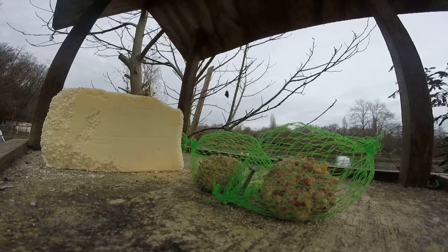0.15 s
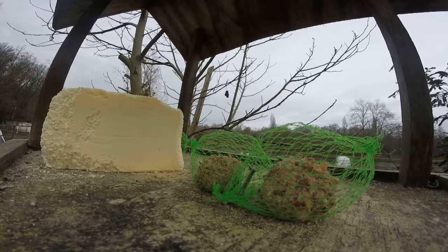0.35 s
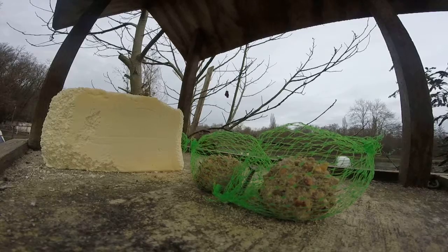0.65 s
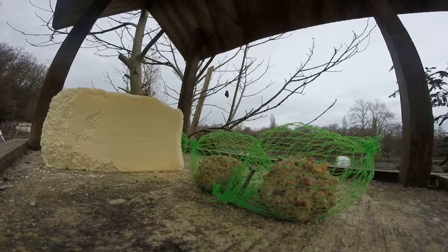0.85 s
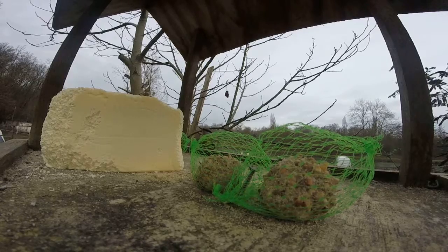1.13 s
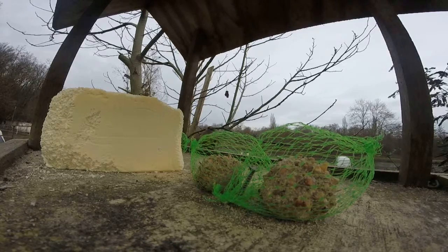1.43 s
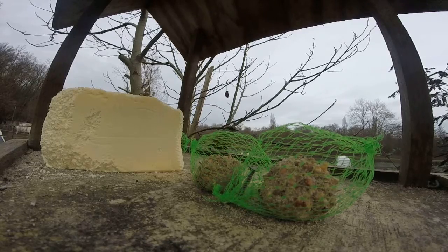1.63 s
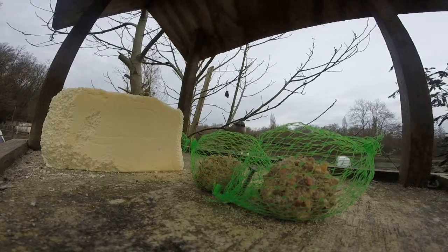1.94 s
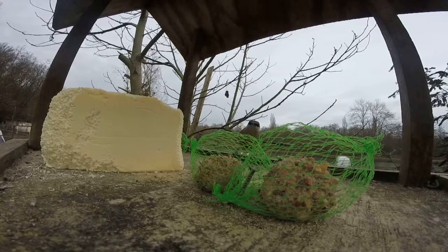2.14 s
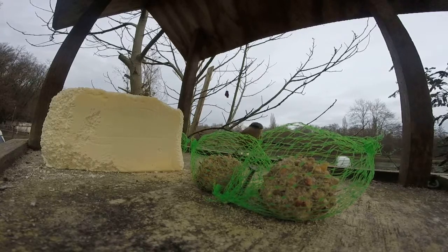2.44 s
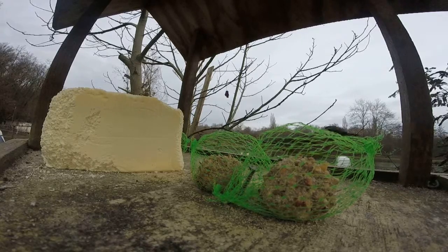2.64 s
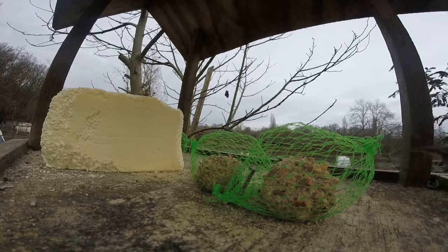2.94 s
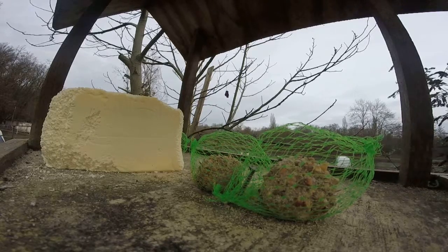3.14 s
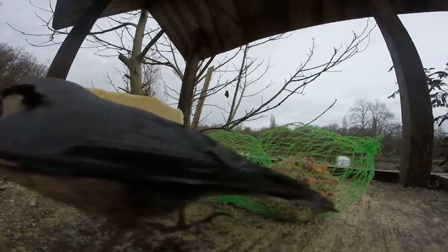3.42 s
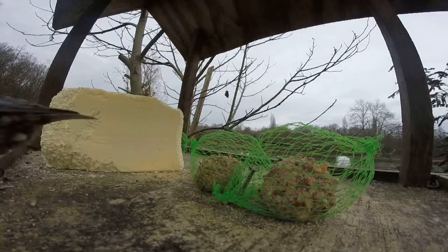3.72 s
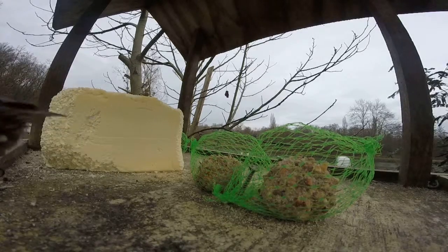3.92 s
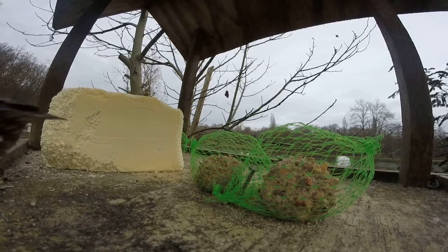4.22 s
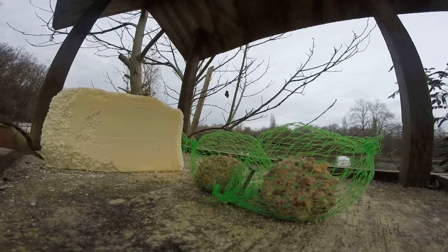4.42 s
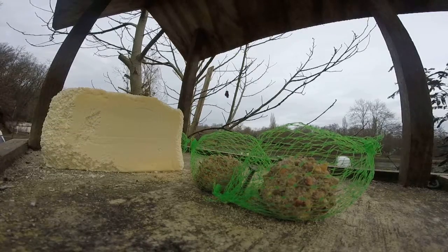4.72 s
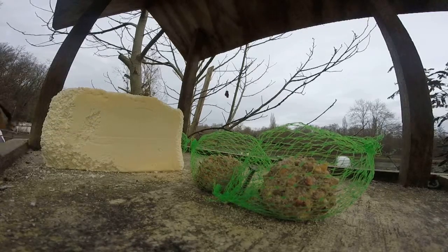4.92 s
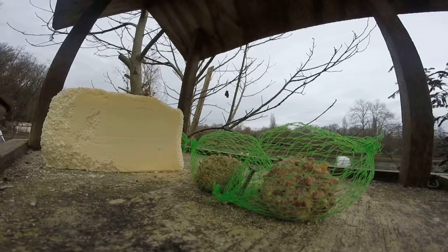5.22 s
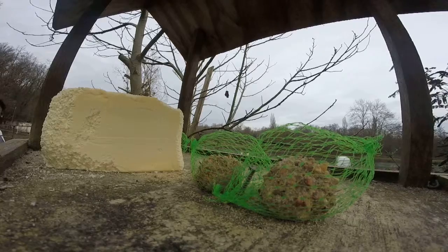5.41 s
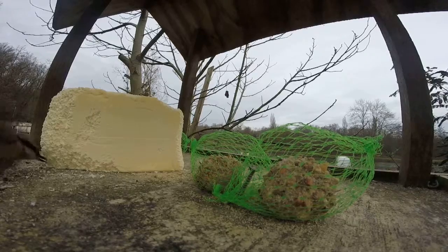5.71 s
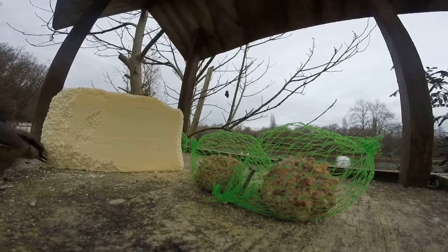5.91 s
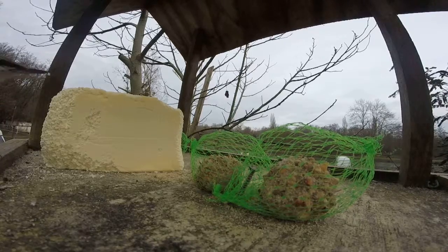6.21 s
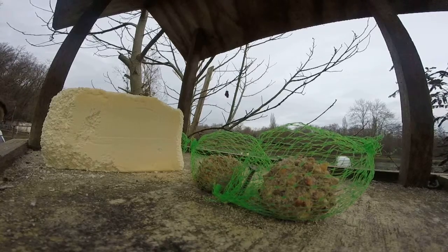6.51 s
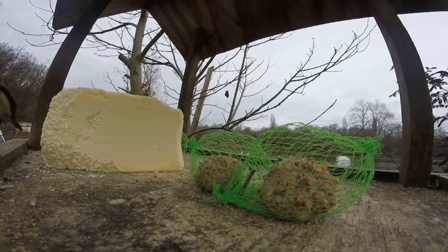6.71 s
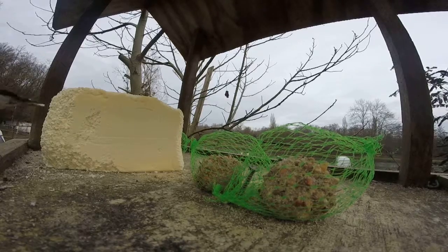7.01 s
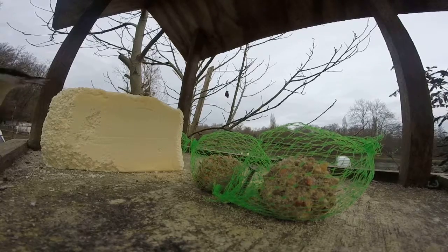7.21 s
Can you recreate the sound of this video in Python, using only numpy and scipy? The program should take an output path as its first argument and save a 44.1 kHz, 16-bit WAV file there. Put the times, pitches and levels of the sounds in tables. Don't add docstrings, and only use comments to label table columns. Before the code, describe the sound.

Very close to a microphone in a hard housing, a small bird lands on a wooden feeder table with sharp clicks and knocks. Its claws tick, scrape and shuffle in uneven bursts between pauses. One light peck comes late, then a firmer one and two full blows that boom hollowly and rattle the boards. Low rumbles follow the hops, over faint hiss.

```python
import sys
import numpy as np
from scipy import signal
from scipy.fft import rfft, irfft, next_fast_len
from scipy.io import wavfile
from scipy.ndimage import uniform_filter1d, map_coordinates

SR = 44100
rng = np.random.default_rng(int(sys.argv[2]) if len(sys.argv) > 2 else 0)


def digitize_waveform(pressure):
    field = np.atleast_2d(pressure).T
    bounded = np.clip(field, -1, 1)
    quanta = np.round(bounded * 32767).astype(np.int16)
    wavfile.write(sys.argv[1], SR, quanta)


def invert_db(level):
    return 10 ** (np.asarray(level, dtype=float) / 20)


N = 324135

# t/s, level/dB
PECK_BLOWS = [
    (4.8962, -24),
    (5.8377, -14),
    (6.0359, -8),
    (6.8777, -8),
]
# f/Hz, share, t60/s
TABLE_MODES = [(303.3, -1, .086), (368.5, .93, .049), (222, -.05, .2), (465, .04, .09)]
# f/Hz, level/dB, t60/s
POST_MODES = [(69, -15.5, 0.096), (109, -29.5, 0.091)]
# f/Hz, width/Hz, level/dB
JOINT_MODES = [(463, 144, 4), (605, 95, 0.5), (697, 78, -0.5), (1500, 170, -7), (1900, 370, -10),
               (3900, 3300, -30.5)]
# f/Hz, width/Hz, level/dB
SHUDDER_MODES = [(229, 52, -0.5), (330, 94, 0.5), (433, 90, -6)]

# f/Hz, width/Hz, level/dB
BOARD_MODES = [(226.2, 12.3, -8), (321, 29, -0.5), (324, 27, 0.5), (385.7, 25.3, -1), (502.6, 13, -14)]
SLAT_MODES = [(590, 100, -12), (750, 61, -26.5), (917, 27, 3), (1120, 94, -4), (1325, 54, -3),
              (1655, 110, -5.5)]
HOUSING_MODES = [(2094, 326, -11), (2520, 187, -1), (2845, 188, -3), (3370, 146, -14), (3980, 300, -19)]
HORN_MODES = [(4330, 2100, 6), (6410, 640, 11.5), (8000, 1400, 4.5), (11200, 5600, -9)]

# t/s, housing click level/dB, board knock level/dB, slat ring level/dB
FOOT_STEPS = [(0.7108, -34, -31, -27.5), (0.7335, -34, -35, -33), (1.5216, -55, -43.5, -45),
              (1.5631, -29, -62, -42), (3.9295, -45.5, -51, -43.5), (2.034, -47, -60, -50),
              (3.937, -50, -59, -57), (1.5713, -48, -42.5, -37), (1.629, -39.5, -40.5, -38),
              (2.028, -47, -42.5, -46), (2.0821, -36, -41.5, -46), (2.0894, -36, -52, -41),
              (2.647, -42.5, -33, -44), (2.652, -40, -51, -37), (2.663, -44, -38, -41),
              (2.8603, -44, -37, -35.5), (2.8664, -31.5, -33, -37), (3.2341, -52, -40, -48),
              (3.2837, -55, -34, -37), (3.2905, -34, -46.5, -39), (3.503, -32, -32, -26.5),
              (3.5975, -33.5, -32.5, -33.5), (3.6049, -43, -33.5, -46), (3.6191, -41, -29, -38),
              (4.4242, -37, -66, -34.5), (4.4552, -39, -43.5, -40), (4.526, -41, -45, -39),
              (4.8467, -51, -40, -44)]
# t/s, housing click level/dB, board knock level/dB,
# slat ring level/dB
FOOT_STAMPS = [
    (0.7247, -28.5, -24, -24),
    (1.62, -27.5, -43, -38.5),
    (3.3105, -30, -60, -40),
    (3.507, -22.5, -24.5, -29.5),
    (4.4206, -34.5, -31.5, -38.5),
    (4.512, -46, -31, -40),
    (4.5171, -35, -36, -40),
    (4.8974, -28, -38, -40),
    (4.9603, -54, -49.5, -64),
]
# t/s, housing click level/dB, slat ring level/dB
CLAW_TAPS = [(0.7618, -45, -42.5), (0.7679, -45, -41), (.775, -41.5, -45), (0.7794, -43, -56),
             (1.9745, -54, -48), (1.9926, -42.5, -50), (2.0468, -48, -56), (2.1138, -37.5, -57),
             (2.7386, -43.5, -63), (2.7633, -39.5, -48), (2.9131, -38.5, -50), (3.0645, -47, -52),
             (0.7495, -48, -53), (3.3415, -45.5, -56), (3.5472, -39.5, -57), (3.6315, -41, -36),
             (3.6445, -42, -41), (3.6538, -38, -40.5), (3.667, -51, -50), (4.555, -58, -64),
             (3.405, -58, -55), (4.4372, -39, -46), (4.868, -45, -51), (4.8935, -34, -47), (5.79, -46, -55),
             (5.8288, -44, -41), (5.9893, -43, -52), (6.019, -52, -51), (6.272, -54, -71),
             (6.316, -47, -60)]
# t/s, housing click level/dB, slat ring level/dB
BEAK_SKIPS = [(5.8387, -37, -32), (5.8501, -43, -48), (5.8563, -42, -50), (6.0372, -26.5, -28),
              (6.0426, -34, -39), (6.0489, -41, -52), (6.0563, -36, -43), (6.8801, -24, -24.5),
              (6.8972, -29.5, -62), (6.9061, -38.5, -50), (6.972, -46, -65)]
# start t/s, length/s, housing click level/dB, board knock level/dB
CLAW_DRAGS = [
    (0.741, 0.02, -55, -41),
    (1.632, 0.014, -51, -47.5),
    (1.967, 0.021, -59, -50.5),
    (2.571, 0.042, -56, -56),
    (2.671, 0.014, -60, -56),
    (2.714, 0.063, -53, -59),
    (2.886, 0.025, -55, -50.5),
    (3.299, .024, -52, -64),
    (3.638, 0.051, -58, -51),
    (4.523, .016, -58, -42),
]
# t/s, level/dB
CLAW_SNAPS = [(.7137, -37), (0.7244, -36), (.7338, -56), (1.5645, -42), (1.629, -50), (2.0829, -43),
              (2.652, -50), (2.7636, -52), (2.8665, -40), (3.2834, -55), (3.2901, -47), (3.3105, -46),
              (3.503, -37), (3.5063, -34.5), (3.5468, -50), (3.598, -43), (3.62, -47), (3.647, -51),
              (4.4239, -54), (4.4536, -48.5), (4.8471, -54)]
# t/s, level/dB
BEAK_SNAPS = [
    (4.8968, -37),
    (5.8387, -51),
    (6.0372, -42),
    (6.0426, -43),
    (6.0563, -39.5),
    (6.8801, -34.5),
    (6.885, -47),
    (6.8972, -35.5),
]

# start t/s, length/s, level/dB
SHUFFLES = [(0.806, .025, -60), (.83, 0.15, -67), (1.927, 0.084, -71), (2.539, 0.094, -59),
            (2.693, 0.096, -62.5), (2.92, 0.046, -61.5), (3.184, .08, -61), (3.352, .09, -62),
            (3.677, .04, -67), (4.347, .05, -58), (4.457, 0.073, -57), (4.526, .04, -68),
            (4.827, 0.093, -62), (5.896, 0.045, -64), (6.064, .03, -71.5), (6.1, .18, -70.5),
            (6.92, 0.093, -65)]
# peak t/s, rocking level/dB, post hum level/dB
WEIGHT_SHIFTS = [(.76, -42, -43.5), (.89, -43, -68), (1.06, -53, -46.5), (1.22, -49, -57),
                 (1.4, -50.5, -66), (1.65, -45, -50.5), (2.06, -49, -56), (2.21, -50, -56),
                 (2.39, -54, -65), (2.6, -53.5, -55), (2.79, -49.5, -62), (2.9, -44, -51), (3.07, -49, -51),
                 (3.24, -58, -52), (3.45, -41.5, -50.5), (3.61, -45.5, -55), (3.8, -55, -65),
                 (4.44, -48.5, -56), (4.53, -48, -42), (4.945, -59, -42), (5.08, -46, -53),
                 (5.845, -58, -41), (5.96, -44, -46), (6.05, -52, -41.5), (6.2, -43.5, -52),
                 (6.46, -50, -58), (6.67, -51, -67), (6.885, -53, -40), (6.97, -42, -44), (7.23, -59, -64)]
# f/Hz, level/dB per Hz
ROCK_SPECTRUM = [(6, -45), (10, -2.5), (25, -6.5), (45, -9.5), (70, -29.5), (200, -120)]
# f/Hz, level/dB per Hz
HUM_SPECTRUM = [(20, -120), (35, -19.5), (50, -2.5), (72, 0.5), (110, -7.5), (170, -10.5), (260, -30.5),
                (500, -120)]
# middle t/s, level/dB
FAR_CHIRPS = [
    (0.229, -74),
    (0.646, -64),
]
# f/Hz, level/dB per Hz
HISS_SPECTRUM = [(5.9, -39.5), (10, 2.5), (24, -5), (132, -11.5), (310, -12.5), (1060, -20), (3720, -27),
                 (15300, -44)]


def pecks():
    t = np.arange(16384) / SR
    boom = sum(share * np.sin(2 * np.pi * hz * t) * invert_db(-60 * t / t60) for hz, share, t60 in TABLE_MODES)
    boom *= 1 - np.exp(-t / 0.0019)
    boom -= sum(invert_db(db - 60 * t / t60) * np.sin(2 * np.pi * hz * t) for hz, db, t60 in POST_MODES)

    grit = rng.standard_normal((len(PECK_BLOWS), len(t)))
    jolt = (invert_db(-60 * t / 0.058) + 0.06 * invert_db(-60 * t / 0.14)) * (1 - np.exp(-(t / 0.0043) ** 2)) * grit
    trembling = invert_db(-60 * t / 0.18) * (1 - np.exp(-(t / 0.022) ** 2)) * grit
    loose = invert_db(-19) * rung(evened(jolt), JOINT_MODES, scatter_db=2.5, top_hz=5360)
    loose += invert_db(-26) * rung(trembling, SHUDDER_MODES, scatter_db=1, top_hz=805)

    out = np.zeros(N + SR)
    for (s, db), rattle in zip(PECK_BLOWS, loose):
        out[round(s * SR):][:len(t)] += invert_db(db) * (boom + rattle)
    return out[:N]


def contacts():
    s, click_db, knock_db, ring_db, ms = np.transpose(contact_rows())[:, :, None]
    force, _ = slips(ms)
    sound = invert_db(click_db) * rung(force, HOUSING_MODES, scatter_db=3, top_hz=4700)
    sound += invert_db(knock_db - 3.5) * rung(force, BOARD_MODES, scatter_db=5, top_hz=860)
    sound += invert_db(ring_db - 0.5) * rung(force, SLAT_MODES, scatter_db=5.5, top_hz=2590)
    return placed(s, sound)


def contact_rows():
    step_ms, stamp_ms, tap_ms, beak_ms, slip_ms = 4.56, 1.6, 3.9, 3.05, 4.7
    rows = [(s, click, knock, ring, step_ms) for s, click, knock, ring in FOOT_STEPS]
    rows += [(s, click, knock, ring, stamp_ms) for s, click, knock, ring in FOOT_STAMPS]
    rows += [(s, click, click - 12, ring, tap_ms) for s, click, ring in CLAW_TAPS]
    rows += [(s, click, -120, ring, beak_ms) for s, click, ring in BEAK_SKIPS]
    for s, length, click, knock in CLAW_DRAGS:
        when = s + length * (np.arange(4) + rng.random(size=4) / 2) / 4
        scatter_db = 3.5 * rng.standard_normal(size=(4, 3))
        for at, (a, b, c) in zip(when, scatter_db):
            rows.append((at, click + a, knock + b, click - 1 + c, slip_ms))
    return rows


def ticks(rows, top_hz):
    s, db = np.transpose(rows)[:, :, None]
    force, u = slips(np.full_like(s, 3.9))
    snap = rung(force * np.exp(-0.8 * u), HORN_MODES, scatter_db=2.5, top_hz=top_hz)
    return placed(s, invert_db(db - 5) * snap)


def slips(ms):
    t = np.arange(6144) / SR
    length_scatter = np.exp(0.1 * rng.standard_normal(ms.shape))
    rise_s = np.maximum(ms, 0.5) * length_scatter * 0.00036
    u = t / rise_s
    return evened(u * np.exp(-u) * rng.standard_normal((len(ms), len(t)))), u


def shuffle():
    even_length = N + N % 2
    grit = rng.standard_normal((1, even_length)) * invert_db(10 * rng.standard_normal(even_length))
    wood = unit(rung(grit, SLAT_MODES, scatter_db=7, top_hz=2500))
    shell = unit(rung(grit, HOUSING_MODES, scatter_db=4, top_hz=4000))
    t = np.arange(N) / SR
    level = np.zeros(N)
    for s, length, db in SHUFFLES:
        to_edge = np.minimum(t - s, s + length - t)
        level += invert_db(db) * np.clip(to_edge / 0.0071, 0, 1)
    return level * invert_db(3.7 * wobble(120) - 6.5) * (1.25 * wood + 0.71 * shell)[0, :N]


def sway():
    _, rock_db, hum_db = np.transpose(WEIGHT_SHIFTS)
    lumps = unit(invert_db(2.8 * wobble(13)) * noise(ROCK_SPECTRUM))
    hum = unit(invert_db(4.8 * wobble(31)) * noise(HUM_SPECTRUM))
    rocking = shaking(rock_db - 1, rise_s=0.047, t60=1, rest_db=-64) * lumps
    humming = shaking(hum_db - 1.5, rise_s=0.019, t60=0.5, rest_db=-67) * hum
    return rocking + humming


def shaking(levels_db, rise_s, t60, rest_db):
    t = np.arange(0, N / SR, 1 / 1000)
    since = t - np.array(WEIGHT_SHIFTS)[:, :1]
    fall_db = 60 * np.where(since < 0, (since / (3 * rise_s)) ** 2, since / t60)
    power = invert_db(2 * rest_db) + invert_db(2 * (levels_db[:, None] - fall_db)).sum(axis=0)
    return np.interp(np.arange(N) / SR, t, np.sqrt(power))


def chirps():
    low_hz, high_hz, sweep_s, width_s = 5800, 8400, 0.0049, 0.0057
    out = np.zeros(N)
    for s, db in FAR_CHIRPS:
        t = np.arange(N) / SR - s
        hz = low_hz + (high_hz - low_hz) * (1 + np.tanh(t / sweep_s + 0.3)) / 2
        hz -= 45000 * np.clip(t - 0.008, 0, 0.05)
        swell = np.exp(-(t / width_s) ** 2)
        swell += 0.13 * np.exp(-((t - 0.009) / width_s) ** 2)
        out += swell * invert_db(db + 6.5 + 2.5 * wobble(300)) * np.sin(2 * np.pi * np.cumsum(hz) / SR)
    return out


def hiss():
    return invert_db(-59 + 0.42 * wobble(0.86)) * noise(HISS_SPECTRUM)


def rung(force, modes, scatter_db, top_hz):
    f = np.fft.rfftfreq(force.shape[1], 1 / SR)
    shapes = []
    for k, (centre, width, _) in enumerate(modes):
        resonance = 1j * f * width / (centre * centre - f * f + 1j * f * width)
        shapes.append((-1) ** k * resonance)
    scatter = scatter_db * rng.standard_normal((len(force), len(modes)))
    gains = invert_db(np.array(modes)[:, 2] + scatter)
    damping = 1 / (1 - (f / top_hz) ** 2 + 1j * np.sqrt(2) * f / top_hz) ** 2
    sound = irfft(rfft(force) * (gains @ np.array(shapes)) * damping)
    return sound / np.abs(sound).max(axis=1, keepdims=True)


def evened(force):
    spectrum = rfft(force)
    smooth_power = uniform_filter1d(np.abs(spectrum) ** 2, size=40, axis=1)
    cepstrum = irfft(-np.log(smooth_power) / 2)
    half = force.shape[1] // 2
    cepstrum[:, 1:half] *= 2
    cepstrum[:, half + 1:] = 0
    return irfft(spectrum * np.exp(rfft(cepstrum)))


def placed(s, sound):
    at = np.round(s * SR).astype(int) + np.arange(sound.shape[1])
    return np.bincount(at.ravel(), sound.ravel(), N + sound.shape[1])[:N]


def noise(spectrum):
    m = next_fast_len(N + 8192)
    hz, db = np.transpose(spectrum)
    log_f = np.log(np.fft.rfftfreq(m, 1 / SR) + 1)
    gain = invert_db(np.interp(log_f, np.log(hz + 1), db))
    return unit(irfft(rfft(rng.standard_normal(m)) * gain, m)[:N])


def wobble(rate):
    knots = rng.standard_normal(int(N * rate / SR) + 4)
    return map_coordinates(knots, [np.arange(N) * rate / SR])


def unit(x):
    return x / np.sqrt(np.mean(x ** 2) + 1e-20)


def thinned(x):
    thin_hz, top_hz = 12800, 15050
    hz, _, z = signal.stft(x, SR, nperseg=1024)
    field = uniform_filter1d(rng.standard_normal(z.shape), size=3, axis=1)
    field = uniform_filter1d(field, size=4, axis=2)
    middle = (hz > 1500) & (hz < 4000)
    busy = np.abs(z[:, middle]).mean(axis=1, keepdims=True) > invert_db(-69)
    kept = ((unit(field) > 0.1) & ~busy) | (np.abs(z) > invert_db(-94))
    hz = hz[:, None]
    gain = np.where(hz < thin_hz, 1, invert_db(1) * kept) * (hz < top_hz)
    return signal.istft(z * gain, SR, nperseg=1024)[1][:, :N]


def scene():
    snaps = ticks(CLAW_SNAPS, top_hz=15100) + ticks(BEAK_SNAPS, top_hz=7200)
    return (pecks() + contacts() + snaps + shuffle() + sway() + chirps() + hiss())[None]


def roll_off(x):
    return signal.sosfilt(signal.butter(12, 15420, fs=SR, output="sos"), x)


def record(dry):
    mix = thinned(dry)
    return roll_off(mix)


dry = scene()
out = record(dry)
digitize_waveform(out)
```